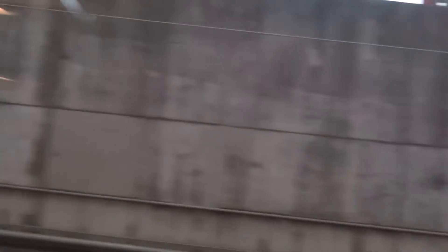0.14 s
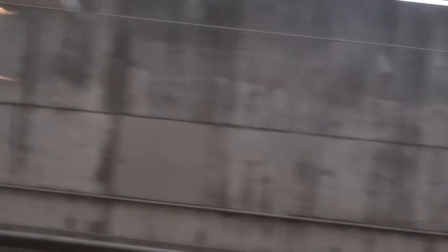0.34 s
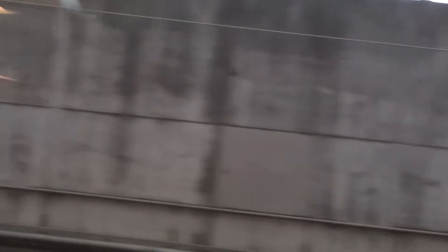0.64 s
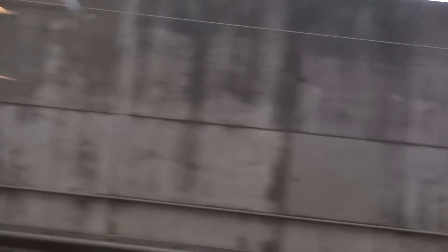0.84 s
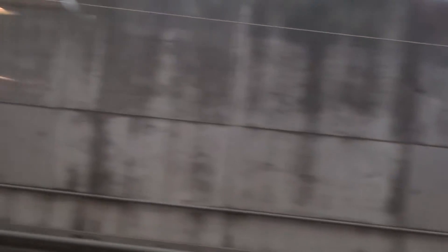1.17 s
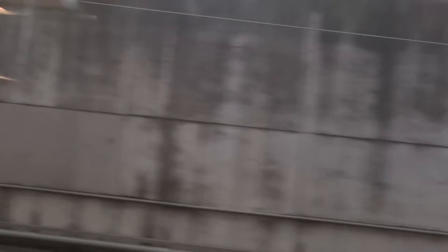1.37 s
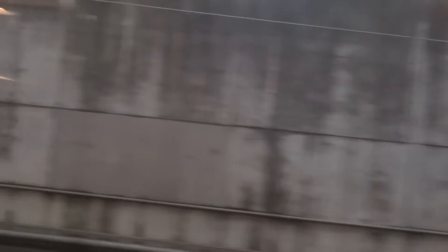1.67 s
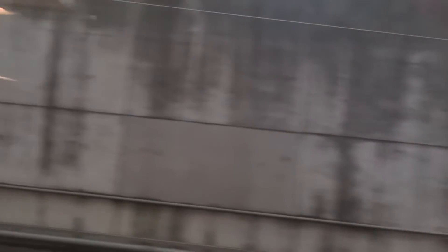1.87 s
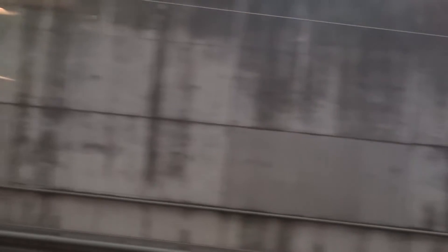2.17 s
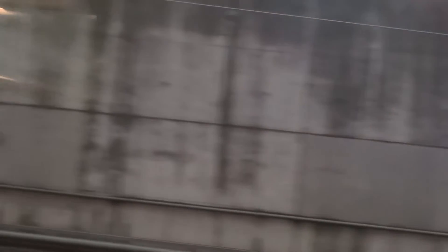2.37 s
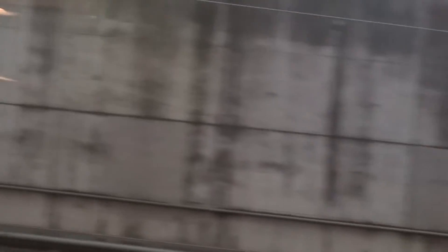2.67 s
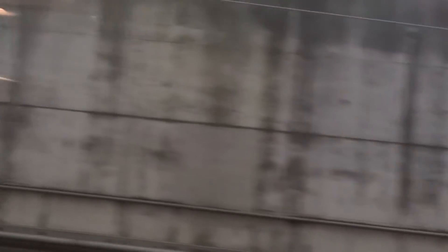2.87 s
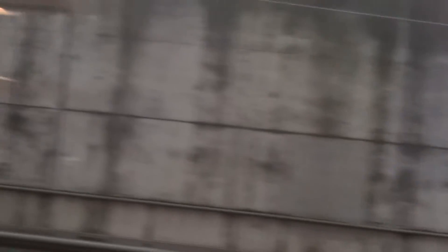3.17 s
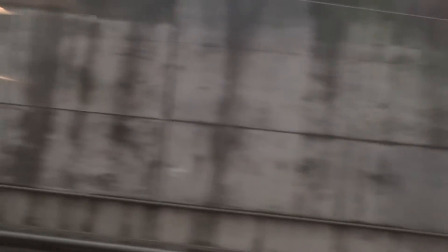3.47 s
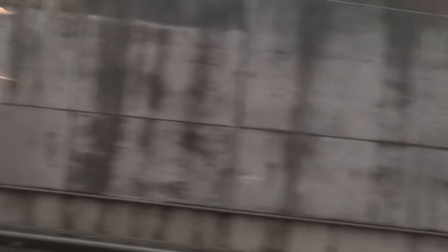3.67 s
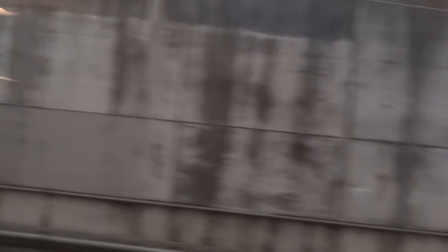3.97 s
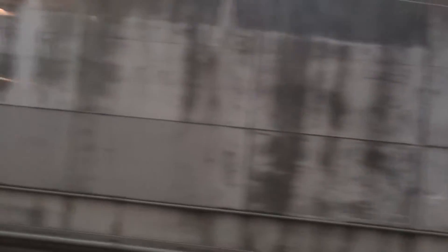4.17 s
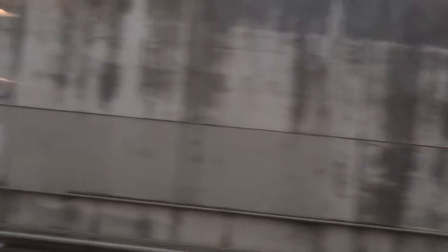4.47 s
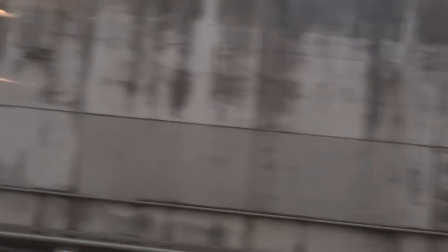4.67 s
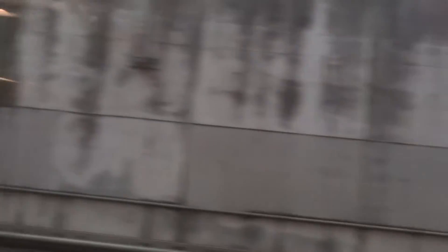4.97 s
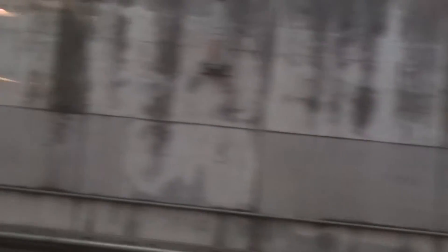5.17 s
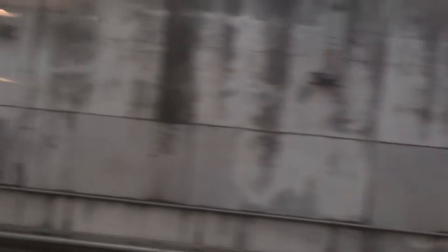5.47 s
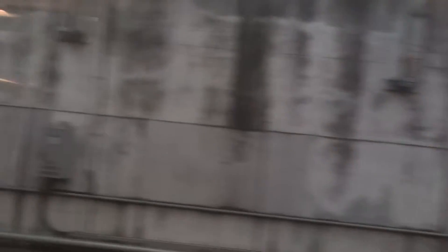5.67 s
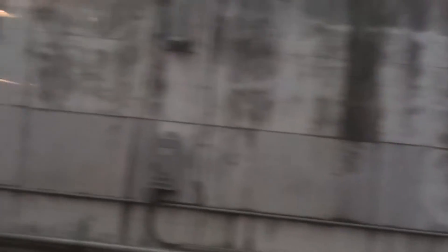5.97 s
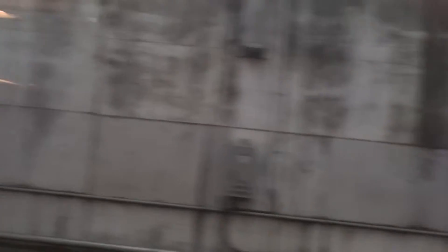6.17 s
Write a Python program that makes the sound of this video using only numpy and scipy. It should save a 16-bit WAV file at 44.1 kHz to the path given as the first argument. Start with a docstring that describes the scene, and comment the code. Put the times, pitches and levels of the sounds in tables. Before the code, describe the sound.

From inside the carriage, an electric train rumbles continuously through a tunnel, gathering speed very slowly. Brief low thuds dot the wheel noise at uneven intervals. A pulsing electrical hum holds one pitch, and above it a fluttering gear whine edges higher. Far behind are a wavering metal note from a wheel, thin electrical tones, a faint hiss of air along the window and a few tiny ticks from loose fittings.

```python
"""Inside an electric train that gathers speed very slowly in a tunnel.
Wheels on rails fill the carriage with rumble, and the tunnel wall throws back a rushing noise.
Electrical equipment hums and throbs, short low booms come and go, a gear whine creeps upward and
a wheel sings faintly. Behind these are the thin tones of the power converter, air hissing along
the window, and loose fittings that tick and squeak."""
import sys
import numpy as np
from scipy import signal
from scipy.fft import rfft, irfft
from scipy.io import wavfile
from scipy.ndimage import uniform_filter1d, map_coordinates

SR = 44100
rng = np.random.default_rng(int(sys.argv[2]) if len(sys.argv) > 2 else 0)


def int16_out(signal):
    """Quantize to a 16-bit WAV file."""
    q = np.round(np.clip(np.atleast_2d(signal).T, -1, 1) * 32767)
    wavfile.write(sys.argv[1], SR, q.astype(np.int16))


N = 278712


def rolling(sways_per_s=9):
    """Wheels rumble louder on rougher track, while the tunnel's rush stays nearly steady."""
    # how rough the track is: (time [s], roughness above the usual [dB])
    roughness = [(0, 2), (.22, -4.5), (.4, 2.5), (.54, -1), (.8, -0.5), (1.2, -0.5), (1.5, -5.5),
                 (1.66, 2.5), (1.98, 0), (2.2, 2), (2.45, 4), (2.67, -1.5), (2.8, 2.5), (3.1, -3),
                 (3.55, 1), (3.85, -2), (4.27, 0.5), (4.4, -2.5), (4.63, 1.5), (4.83, -1.5), (5.0, -1),
                 (5.15, 4), (5.37, -4), (5.55, 1), (5.7, 1), (5.82, -3), (6.05, 0), (6.32, -1)]
    rough_db, = curves(roughness)
    noise = cabin_noise()

    def part(lo_hz, hi_hz, level_db, follow, sway_db, even_s):
        """One band of the noise; it sways at random and gains follow dB per dB of roughness."""
        gain = amp(level_db + follow * rough_db + sway_db * wobble(sways_per_s))
        return gain * even(band(noise, lo_hz, hi_hz), even_s)
    deep_rumble = amp(rumble_swells()) * part(0, 110, level_db=-35.5, follow=0.1, sway_db=0.2, even_s=0.5)
    body_boom = part(110, 300, level_db=-26, follow=0.67, sway_db=0.4, even_s=0.16)
    wheel_roar = part(300, 750, level_db=-29, follow=0.25, sway_db=0.5, even_s=0.05)
    tunnel_rush = part(750, 4000, level_db=-40, follow=0, sway_db=0.34, even_s=0.5)
    return deep_rumble + body_boom + wheel_roar + tunnel_rush


def cabin_noise(ripple_db=2.0):
    """Rolling noise, stronger at the pitches where carriage, wheels and rails like to ring."""
    # overall shape of the noise indoors: (frequency [Hz], relative level [dB])
    slope = [(10, -31.5), (24, -11.5), (60, -7), (150, -1.5), (350, -2), (520, -7.5), (680, -9.5),
             (850, -21.5), (1300, -22), (2400, -31.5), (3500, -42.5), (3950, -47)]
    # peaks and dips from the carriage: (frequency [Hz], width [Hz], boost [dB])
    carriage_peaks = [(45, 6.8, 3), (72.5, 12, 6.5), (113, 9, 4), (140, 15, 7.3), (174, 17, 5.8),
                      (193, 10, -2), (211.3, 19, 7.5), (252, 24, -4), (287, 19, 2.5), (353.4, 23, 6.5),
                      (465.7, 18, 4), (500, 22, -2), (540, 14, -1), (1270, 110, 1.5), (1517, 89, -4),
                      (1788, 110, 3), (2110, 130, -2.3), (2454, 73, 6.5), (3270, 250, 5), (3604, 152, 6)]
    # narrow ringing of wheels and rails: (frequency [Hz], width [Hz], boost [dB])
    wheel_peaks = [(654, 13, 1), (895, 33, 3.5), (1022, 17, 5), (1153, 22, 3.5), (1250, 18, 2.3),
                   (1320, 27, 2), (1750, 20, 2), (1807, 23, 3), (1840, 23, 1.5), (1970, 36, 5.5),
                   (2215, 23, 2.5), (2323, 30, 5.5), (2670, 34, 3), (4390, 150, 1.5), (4750, 150, 1.5),
                   (5200, 180, -2.5)]

    def colour_db(hz):
        """The overall shape, the peaks, and a ripple that deepens towards the treble."""
        peaks_db = sum(db * np.exp(-2 * ((hz - centre) / width) ** 2)
                       for centre, width, db in [*carriage_peaks, *wheel_peaks])
        depth_db = ripple_db * np.clip(hz / 3500, 0, 1) ** 2
        return along(slope, hz) + peaks_db + depth_db * ripple(hz)
    return stereo_noise(colour_db)


def rumble_swells():
    """The deep rumble swells briefly now and then; gives the boost in dB."""
    # swells of the deep rumble: (time of peak [s], length [s], boost [dB])
    swells = [(.2, .2, 2.5), (0.474, 0.17, 9.5), (1.95, .2, 3), (2.443, 0.19, 8.5), (2.8, 0.17, 4.5),
              (3.31, 0.084, 5.5), (4.42, 0.34, 2), (4.724, 0.14, 3), (5.05, 0.12, 4.5), (5.232, .12, 4.5)]
    return sum(db * swell(s, length) for s, length, db in swells)


def hum(pitch_hz=338.8, wander_hz=1.18, base_db=-33, flutter_db=1.07, rough_db=1.5):
    """The electric drive hums near one pitch, with a rough edge, and throbs a few times a second."""
    # throbs added to the base hum: (time of peak [s], length [s], level [dB])
    throbs = [(.14, .1, -28), (.26, .13, -26), (.59, .2, -27), (.815, .05, -28), (.92, .07, -26.5),
              (1.02, .1, -28.5), (1.11, .08, -23.3), (1.34, .1, -25.5), (1.58, .18, -30), (1.78, .12, -26),
              (1.91, .1, -22.8), (2.29, .09, -23.3), (2.44, .16, -32), (2.68, .12, -34), (2.825, .1, -24.8),
              (2.97, .14, -31.5), (3.24, .14, -26.8), (3.69, .13, -25.3), (3.9, .09, -25.3),
              (4.14, .075, -22.3), (4.28, .12, -29.5), (4.6, .14, -26.7), (4.79, .11, -25),
              (5.09, .16, -22.7), (5.545, .12, -23), (5.68, .11, -26.3), (6.035, .16, -22.5)]
    level = amp(base_db) + sum(amp(db) * swell(s, length) for s, length, db in throbs)
    flutter = unit(amp(flutter_db * wobble(40) + rough_db * wobble(110)))
    return level * flutter * tone(pitch_hz + wander_hz * wobble(22), lean_db=3.5, lag=0.19)


def booms(knock_hz=850, knock_fade_s=0.13, knock_rise_s=0.0055, boom_peak_s=0.02):
    """Short low booms in the rumble, a few with a knock loud enough to hear."""
    # the booms: (time [s], boom pitch [Hz], boom level [dB], knock level [dB])
    events = [(.395, 168, -20, -39), (0.629, 159, -22, -55), (.86, 185, -23, -53.5), (1.011, 158, -23, -56),
              (1.22, 160, -23.5, -55), (1.722, 195.4, -20.5, -55), (1.89, 151.3, -22, -55),
              (2.008, 163, -23, -52), (2.097, 167.5, -23, -53), (2.355, 160, -20, -42),
              (2.575, 178, -25.5, -53), (2.76, 150, -27, -36), (2.868, 168, -22, -54),
              (3.091, 151, -35, -41), (3.48, 178, -25, -53), (3.601, 174, -22, -52),
              (4.106, 177, -22.5, -53), (4.75, 149, -36, -41), (5.049, 144, -19, -37.5),
              (5.104, 151.5, -20, -43), (5.275, 194, -21.5, -53), (5.406, 150, -20, -55),
              (5.48, 140, -17, -56), (5.665, 177, -20.5, -55), (6.214, 162, -22.5, -55)]
    out = np.zeros(N + SR)
    t = np.arange(SR // 3) / SR
    knock_shape = amp(-60 * t / knock_fade_s) * (1 - np.exp(-t / knock_rise_s))
    knock_shape /= knock_shape.max()
    boom_shape = (t / boom_peak_s * np.exp(1 - t / boom_peak_s)) ** 1.5
    knock_noise = noise_around(knock_hz, width_hz=220)
    for s, boom_hz, boom_db, knock_db in events:
        start = round(s * SR)
        boom = amp(boom_db) * boom_shape * np.sin(2 * np.pi * boom_hz * t)
        knock = amp(knock_db) * knock_shape * np.roll(knock_noise, -start)[:len(t)]
        out[start:start + len(t)] += boom + knock
    return out[:N]


def gear_whine(flutter_db=1.0, rough_db=1.3):
    """Meeting gear teeth whine higher as the train speeds up, and flutter as their load changes."""
    # the note of the teeth: (time [s], pitch [Hz], level [dB])
    whine = [(0, 611.6, -37), (.25, 610.5, -35), (.6, 609.5, -37.3), (.85, 610.3, -41), (1.3, 614.5, -41.5),
             (1.45, 617, -34), (1.7, 621, -35), (2, 626.4, -33.3), (2.37, 631, -30.5), (2.6, 631.3, -33.3),
             (2.9, 631.7, -34), (3.35, 634.8, -32.3), (3.5, 635.4, -29.8), (4.0, 638, -29.4),
             (4.17, 639, -28), (4.27, 639.3, -30.5), (4.9, 642.5, -29), (5.07, 643.5, -34.3),
             (5.25, 644.5, -32.3), (5.55, 646, -33.3), (5.75, 647.6, -31.7), (6.32, 650.5, -32.8)]
    pitch_hz, level_db = curves(whine)
    flutter = unit(amp(flutter_db * wobble(20) + rough_db * wobble(70)))
    return amp(level_db) * flutter * tone(pitch_hz + 0.62 * wobble(14), lean_db=2.5, lag=0.22)


def wheel_song(waver_hz=11, waver_db=3):
    """A wheel sings faintly against the rail: a wavering metal note that shifts up and fades."""
    # the wheel's note: (time [s], pitch [Hz], level [dB])
    song = [(0, 1265, -54), (1.35, 1260, -53.5), (1.55, 1308, -55), (3.8, 1300, -56.5), (4.3, 1305, -64),
            (6.32, 1300, -65.5)]
    pitch_hz, level_db = curves(song)
    flutter = unit(amp(waver_db * wobble(22)))
    return amp(level_db) * flutter * tone(pitch_hz + waver_hz * wobble(45), lean_db=1, lag=.2)


def converter(waver_hz=3.5, waver_db=2.6):
    """The power converter's switching makes thin tones that waver among the reflections."""
    # switching tones: (pitch [Hz], level [dB])
    tones = [(1600, -60.5), (2469, -65.5), (3298, -76.5), (3533, -72.5), (3595, -73), (3632, -76.5)]
    return sum(amp(db + waver_db * wobble(14)) * tone(hz + waver_hz * wobble(30), lean_db=1.5, lag=.1)
               for hz, db in tones)


def air_hiss(level_db=-62.7):
    """Air slides evenly along the window, far fainter than the wheels."""
    # shape of the hiss: (frequency [Hz], relative level [dB])
    shape = [(4000, 0), (4900, -.7), (5200, -3.3), (5900, -1.7), (6700, -5), (7300, -9), (8500, -9.8),
             (9400, -10.8), (10300, -6), (10800, -4.7), (11450, -5), (11850, -9.7), (12600, -12),
             (15500, -15)]
    noise = stereo_noise(lambda hz: along(shape, hz) + ripple(hz))
    hiss = unit(band(noise, lo_hz=shape[0][0], hi_hz=SR))
    return amp(level_db + 0.48 * wobble(2.7)) * hiss


def fittings(tick_rise_s=.004, squeak_at_s=3.38, squeak_length_s=.14, squeak_db=-71.5):
    """Loose fittings tick as the carriage shakes, and one squeaks briefly."""
    # small ticks: (time [s], pitch [Hz], level [dB], time to fade by 60 dB [s])
    ticks = [(1.732, 9200, -59, .08), (1.826, 10900, -62, .4), (2.083, 10300, -67, .2)]
    # the tones in the squeak: (pitch [Hz])
    squeak_pitches = [12161, 13313, 14530]
    out = np.zeros(N)
    for s, centre_hz, db, fade_s in ticks:
        age = np.maximum(np.arange(N) / SR - s, 0)
        rise = 1 - np.exp(-age / tick_rise_s)
        out += amp(db - 60 * age / fade_s) * rise * noise_around(centre_hz, width_hz=1300)
    squeak = sum(amp(3 * wobble(25)) * tone(hz + 12 * wobble(40), lean_db=0, lag=0)
                 for hz in squeak_pitches)
    return out + amp(squeak_db) * swell(squeak_at_s, squeak_length_s) * unit(squeak)


def stereo_noise(colour_db):
    """Noise shaped by colour_db(hz), almost the same in both ears in the bass."""
    # how alike the two sides are: (frequency [Hz], likeness [0 to 1])
    likeness = [(60, 0.99), (130, 0.99), (290, 0.94), (640, 0.92), (1410, 0.91), (3100, 0.861),
                (6820, 0.763), (15000, 1)]
    # how much louder the left side is: (frequency [Hz], left minus right [dB])
    lean = [(60, .5), (200, .5), (350, 1.5), (500, 1), (1000, 0.6), (2300, 1.4), (4400, 0.5), (8000, -1),
            (15000, -1)]
    # how far the left wave trails the right: (frequency [Hz], lag [radians])
    lag = [(40, .03), (150, 0.2), (330, 0.21), (420, 0.48), (700, 0.35), (1800, 0.17), (6000, -0.018),
           (15000, 0)]
    hz = np.fft.rfftfreq(N, 1 / SR)
    sides = np.array([[.5], [-.5]])
    spread = np.arccos(np.clip(along(likeness, hz), 0, 1)) / 2
    spectra = rfft(rng.standard_normal((2, N))) * amp(colour_db(hz))
    shared, opposed = spectra * [np.cos(spread), np.sin(spread)]
    placing = amp(sides * along(lean, hz)) * np.exp(-1j * sides * along(lag, hz))
    return irfft(np.array([shared + opposed, shared - opposed]) * placing, N)


def tone(pitch_hz, lean_db, lag):
    """A pure tone; overlapping echoes make it lean_db louder and lag radians later on the left."""
    phase = 2 * np.pi * np.cumsum(pitch_hz * np.ones(N)) / SR
    sides = np.array([[.5], [-.5]])
    return np.sqrt(2) * amp(sides * lean_db) * np.cos(phase - sides * lag)


def ripple(hz, spacing_hz=22):
    """Overlapping echoes make some frequencies a little louder and others a little softer."""
    return map_coordinates(rng.standard_normal(SR // 8), [hz / spacing_hz], mode="mirror")


def noise_around(centre_hz, width_hz):
    """Noise of strength 1, gathered around one pitch."""
    return unit(filtered(rng.standard_normal(N), lambda hz: np.exp(-((hz - centre_hz) / width_hz) ** 2)))


def band(x, lo_hz, hi_hz):
    """The part of x between two frequencies."""
    return filtered(x, lambda hz: (hz >= lo_hz) & (hz < hi_hz))


def filtered(x, gain):
    """x with each frequency multiplied by gain(hz)."""
    return irfft(rfft(x) * gain(np.fft.rfftfreq(N, 1 / SR)), N)


def even(x, span):
    """x at strength 1, with swells longer than span seconds ironed out."""
    power = uniform_filter1d(np.mean(x ** 2, axis=0), max(int(span * SR), 1))
    return x / np.sqrt(np.abs(power) + 1e-20)


def swell(s, length):
    """A smooth rise to 1 at time s and back, about length seconds wide."""
    return np.exp(-(2 * (np.arange(N) / SR - s) / length) ** 2)


def wobble(rate):
    """A smooth curve of strength 1 through rate random points a second."""
    points = rng.standard_normal(int(N * rate / SR) + 4)
    return unit(map_coordinates(points, [np.arange(N) * rate / SR]))


def curves(rows):
    """One value per sample for each column after the time."""
    times, *columns = np.transpose(rows)
    return [np.interp(np.arange(N) / SR, times, column) for column in columns]


def along(points, hz):
    """Join (frequency, value) points on a scale where octaves are evenly spaced."""
    frequencies, values = np.transpose(points)
    return np.interp(np.log(hz + 1), np.log(frequencies + 1), values)


def unit(x):
    """x scaled to an average strength (rms) of 1."""
    return x / np.sqrt(np.mean(x ** 2) + 1e-20)


def amp(db):
    """Turn decibels into a number to multiply by."""
    return 10 ** (np.asarray(db) / 20)


def scene():
    """Everything heard from a window seat."""
    return (rolling() + air_hiss() + booms() + hum() + gear_whine()
            + wheel_song() + converter() + fittings())


def record(dry, top_hz=15750):
    """Cut the highest treble and fade both ends quickly so that they do not click."""
    edges = signal.windows.tukey(N, .001)
    treble_cut = signal.ellip(12, .05, 60, top_hz, fs=SR, output="sos")
    return edges * signal.sosfiltfilt(treble_cut, dry)


dry = scene()
out = record(dry)
int16_out(out)
```